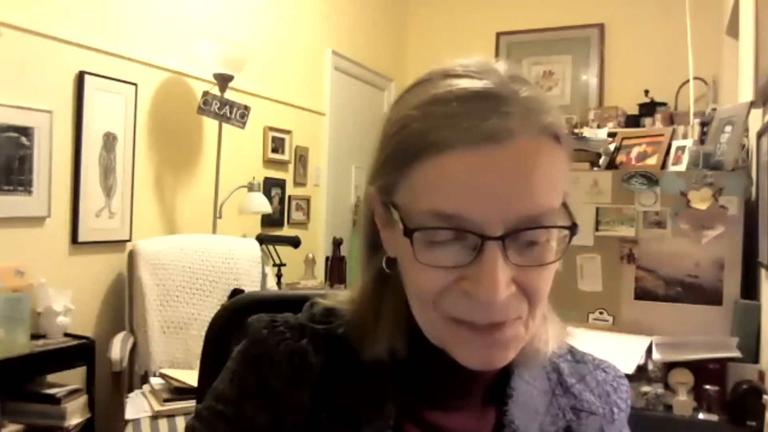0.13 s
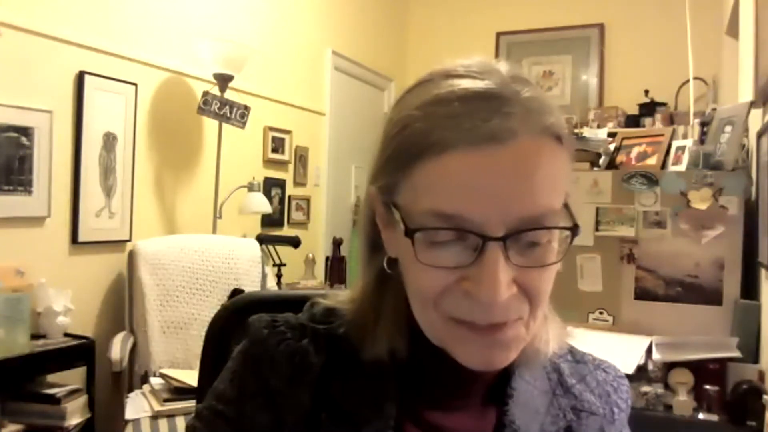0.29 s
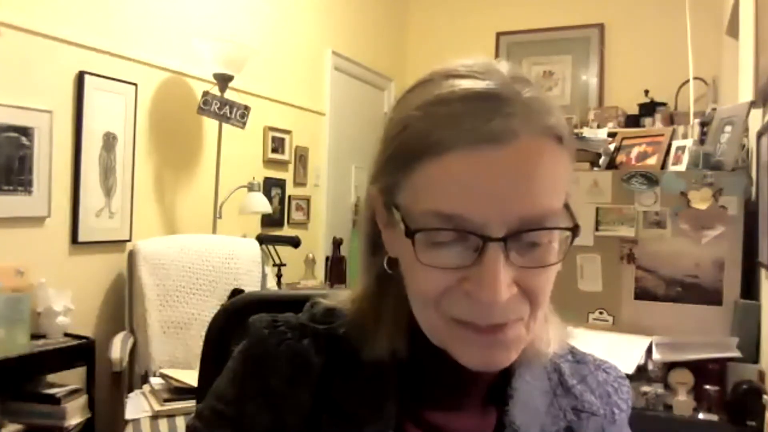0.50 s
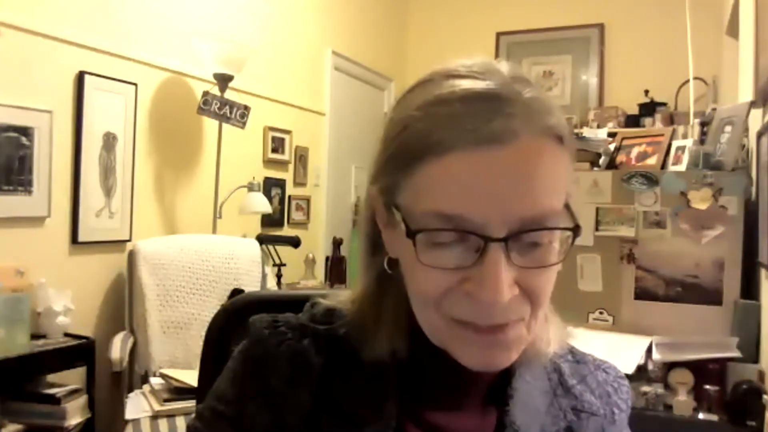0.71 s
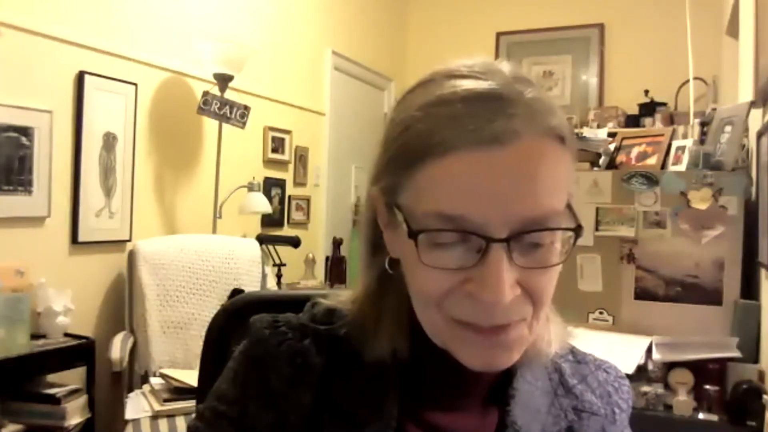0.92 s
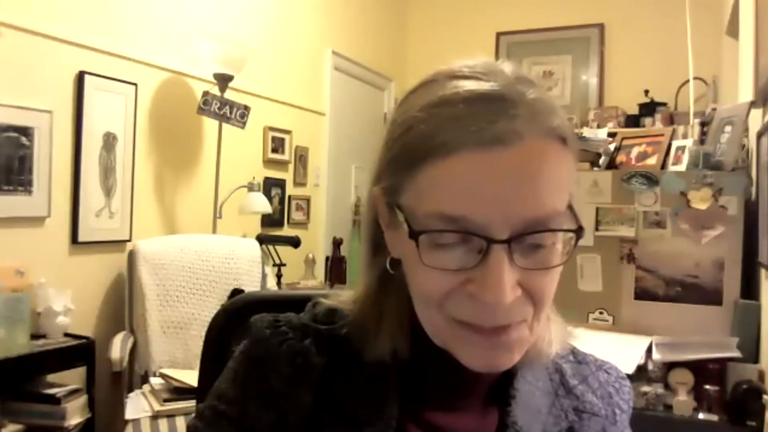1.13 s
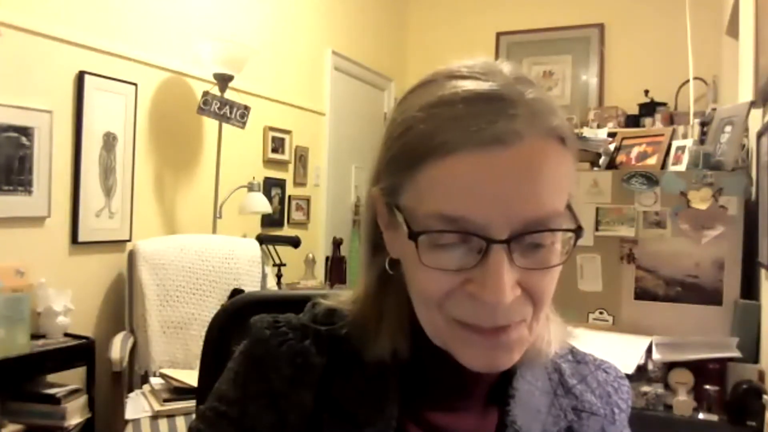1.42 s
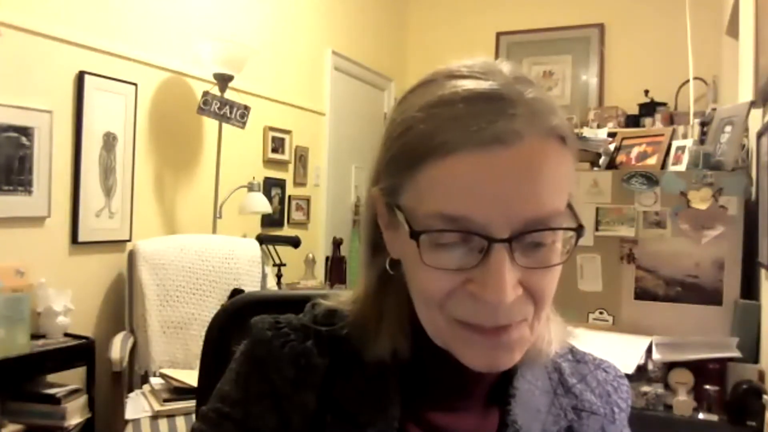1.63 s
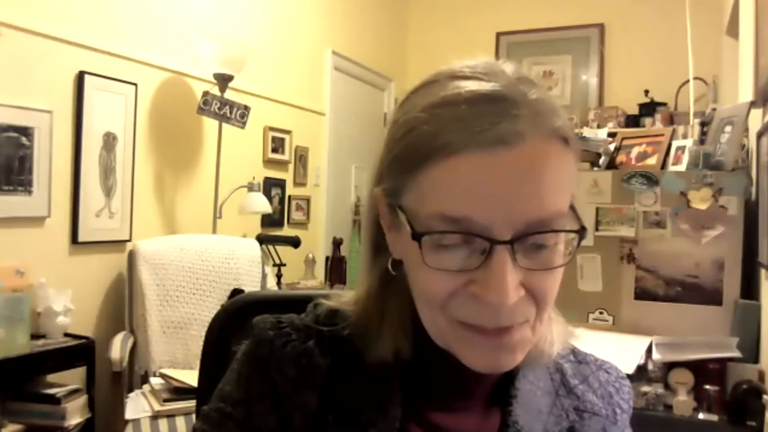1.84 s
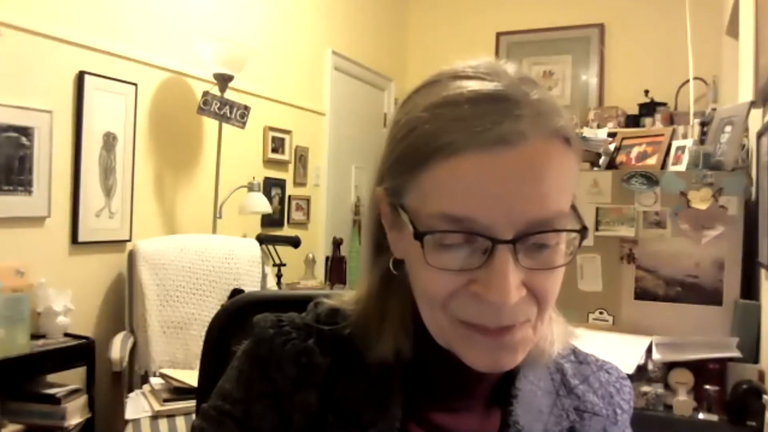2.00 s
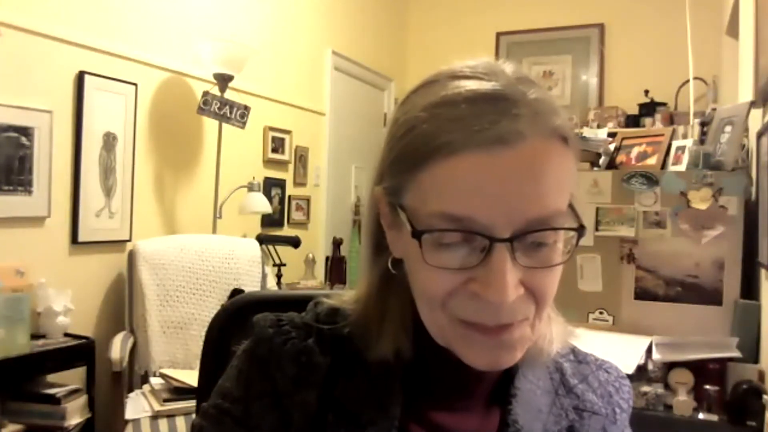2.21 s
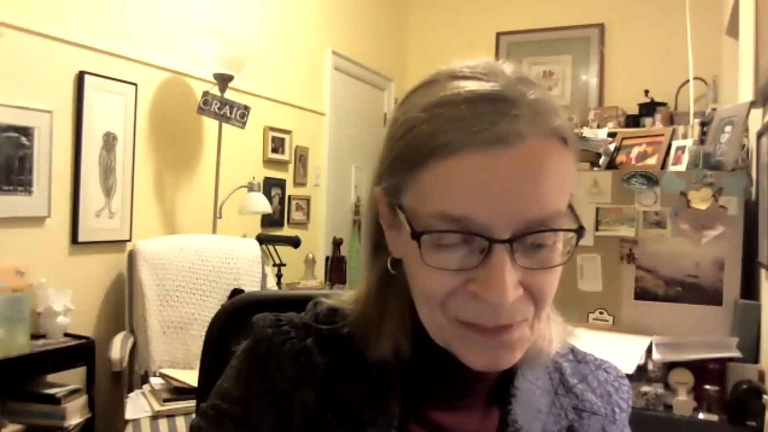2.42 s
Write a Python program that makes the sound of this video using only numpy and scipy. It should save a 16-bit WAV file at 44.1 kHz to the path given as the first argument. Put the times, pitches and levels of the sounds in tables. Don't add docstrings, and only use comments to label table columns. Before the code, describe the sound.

Close keyboard typing, dry and clicky, with a quick run, a sharp hard stroke, scattered taps and a late cluster; soft finger rustles and faint desk thuds between, thin hiss and buzzing hum behind, slightly band-limited laptop microphone sound.

```python
import sys
import numpy as np
from scipy import signal
from scipy.fft import rfft, irfft, next_fast_len
from scipy.io import wavfile
from scipy.ndimage import uniform_filter1d, map_coordinates

SR = 44100
rng = np.random.default_rng(int(sys.argv[2]) if len(sys.argv) > 2 else 0)


def makeup_ratio(level_db):
    decades = np.asarray(level_db, float) / 20
    return 10 ** decades


def materialize(psi):
    bounded = np.clip(np.atleast_2d(psi).T, -1, 1)
    quanta = np.round(bounded * 32767).astype(np.int16)
    wavfile.write(sys.argv[1], SR, quanta)


N = 112455
LEAD = SR // 50


def unit(x):
    return x / np.sqrt(np.mean(x ** 2) + 1e-20)


def along(points, hz):
    f, v = np.transpose(points)
    return np.interp(np.log(hz + 1), np.log(f + 1), v)


def wobble(rate):
    knots = rng.standard_normal(int(N * rate / SR) + 4)
    return map_coordinates(knots, [np.arange(N) * rate / SR])


def filtered(x, response):
    m = next_fast_len(N + SR // 2)
    spectrum = rfft(x, m) * response(np.fft.rfftfreq(m, 1 / SR))
    return irfft(spectrum, m)[..., :N]


def ring(family, t, count=28):
    low_hz, high_hz, t60 = family
    scatter_db, in_step, rise_cycles = 2, 0.8, 0.3
    t = t[:SR // 50]
    luck = rng.standard_normal((2, count, 1))
    place = (np.arange(count)[:, None] + rng.random((count, 1))) / count
    hz = low_hz * (high_hz / low_hz) ** place
    decay = makeup_ratio(scatter_db * luck[0] - 60 * t / t60)
    rise = (1 - np.exp(-t * hz / rise_cycles)) ** 2
    x = np.sum(np.sign(luck[1] + in_step) * decay * rise * np.sin(2 * np.pi * hz * t), 0)
    return x / np.linalg.norm(x)


# frequency in Hz, time to fall 60 dB in seconds.
ROOM_DECAY = [(500, 0.19), (1500, 0.16), (4000, 0.16), (10000, 0.18)]


def room(x, t, wet_db=0):
    tail_db, delay_s = -12.5, 0.0037
    hz, s, z = signal.stft(rng.standard_normal(len(t)), SR, nperseg=128)
    fading = z * makeup_ratio(-60 * s / along(ROOM_DECAY, hz)[:, None])
    tail = signal.istft(fading, SR, nperseg=128)[1][:len(t)] * (t > delay_s)
    echo = signal.fftconvolve(x, tail / np.linalg.norm(tail))[:len(t)]
    return x + makeup_ratio(tail_db + wet_db) * echo


# lowest Hz, highest Hz, time to fall 60 dB in seconds.
CASE_MODES = (630, 1322, 0.019)
STEM_MODES = (1385, 3420, 0.0074)
CAP_MODES = (3694, 5895, 0.0094)
EDGE_MODES = (6420, 12000, 0.014)


def contact(out, s, db, case_db, cap_db, force, fizz_db=0, snap=0):
    grain_db, edge_db = 3.5, -17.5
    t = np.arange(SR // 6) / SR
    size = unit(uniform_filter1d(rng.standard_normal(len(t)), size=25))
    grains = rng.standard_normal(len(t)) * makeup_ratio(grain_db * size)
    shape = force(t - LEAD / SR)
    drive = grains * shape + snap * (np.arange(len(t)) == LEAD)
    parts = [(0, STEM_MODES), (case_db, CASE_MODES), (cap_db, CAP_MODES),
             (cap_db + edge_db + fizz_db, EDGE_MODES)]
    sound = np.zeros(len(t))
    for level, family in parts:
        rung = signal.fftconvolve(drive, ring(family, t))[:len(t)]
        sound += makeup_ratio(level) * rung / np.linalg.norm(rung)
    sound *= np.hypot(np.linalg.norm(shape), snap)
    out[round(s * SR) + LEAD:][:len(t)] += makeup_ratio(db) * room(sound, t)


# start in seconds, peak level in dB, case thud over it in dB,
# cap click over it in dB, extra edge in dB.
KEY_PRESSES = [(0.2402, -20.5, -4.5, -6.5, -5.5), (0.361, -18, -5, -4, -2), (0.449, -24, -1, -20, 0),
               (0.5312, -27, 7, 1.5, 6.5), (0.703, -11.5, -19, -2.5, 4), (0.9017, -19, -1, -8, -6),
               (1.077, -19.5, -6.5, -14.5, 4), (1.1016, -40, 3, -8, -9), (1.2305, -29, 5.5, 7.5, 5.5),
               (1.4779, -29.5, 5.5, 5, 5), (1.727, -17, -1, -4.5, 4), (1.9222, -23, -13, -6, -17),
               (1.9362, -25, -11, -20, -3), (1.9841, -24, 0.5, -6.5, -12), (2.0304, -24.5, -2, -9.5, 4),
               (2.2845, -25.5, 5.5, 2, 5)]


def presses(out):
    press_db = -6
    blow_s, blow_rise_s = 0.0022, 0.0005
    slide_s, slide_db, slide_grows = 0.0067, -9, 0.84
    rattle_s, rattle_db = 0.0081, -2

    def blow(u):
        return np.exp(-(u / np.where(u < 0, blow_rise_s, blow_s)) ** 2)

    for s, db, case_db, cap_db, fizz_db in KEY_PRESSES:
        def slide_and_rattle(u):
            slide = makeup_ratio(slide_db - slide_grows * (db + 20)) * np.clip(1 + u / slide_s, 0, 1) ** 0.5
            rattle = makeup_ratio(rattle_db) * np.exp(-np.abs(u) / rattle_s)
            return np.where(u < 0, slide, rattle)

        contact(out, s, db + press_db, case_db, cap_db, blow, fizz_db)
        contact(out, s, db + press_db, case_db / 2, cap_db / 2, slide_and_rattle, fizz_db)


# start in seconds,
# peak level in dB, case thud over it in dB, cap click over it in dB.
KEY_TICKS = [(0.0924, -32, -2, -26), (0.2356, -33, -33, -29), (0.3127, -34, -3, -21),
             (0.4385, -31, -22, -14), (0.4662, -30.5, -22, -20), (0.4784, -39.5, -29, -18),
             (0.5626, -37.5, -1, -19), (0.6454, -30.5, -9, -23), (0.7147, -22.5, 4.5, -24),
             (0.8043, -32, -4, -21), (0.9742, -47, 10, -26), (0.9911, -34.5, -3, -24),
             (1.0112, -26, -2.5, -16), (1.1636, -35, -9, -22), (1.1826, -25.5, 1.5, -6),
             (1.2015, -28, -13, -21), (1.276, -36.5, 1.5, -14), (1.3151, -34.5, -4, -15),
             (.1185, -31.5, -3, -5), (.5318, -21.5, 0, -2), (1.2303, -18.5, -5.5, -2.5),
             (1.3405, -24.5, 0.5, 0), (1.4823, -22, 2.5, 0.5), (1.5565, -32, 4.5, -6.5),
             (1.5635, -27.5, 2, -1), (1.9217, -23.5, -5, -2), (1.9837, -25, -2.5, -1.5),
             (2.2858, -22.5, 0, -0.5), (2.4105, -32, -3, -1.5), (2.4185, -29.5, -1.5, 1),
             (1.4895, -28, -8, 6.5), (1.5432, -31.5, -1, -5), (1.803, -35, -32, -31),
             (1.9524, -46.5, 14.5, 7), (2.0184, -26.5, -15, -16), (2.0674, -33, -13, -9),
             (2.321, -37, 5, -15), (2.37, -45, -9, -20), (2.394, -31.5, -1.5, -28)]


def ticks(out):
    grit_db, grit_s = -6.5, 0.00045
    scrape_db, scrape_s = -15.5, 0.0075

    def snap_and_drag(u):
        grit = makeup_ratio(grit_db) * np.exp(-np.abs(u) / np.where(u < 0, grit_s / 2, grit_s))
        scrape = makeup_ratio(scrape_db) * np.exp(-np.abs(u) / np.where(u < 0, scrape_s / 3, scrape_s))
        return grit + scrape

    for s, db, case_db, cap_db in KEY_TICKS:
        contact(out, s, db, case_db, cap_db, snap_and_drag, snap=4)


# start in seconds, level in dB, case thud over it in dB,
# cap click over it in dB, length in seconds.
KEY_RETURNS = [(-.006, -40.5, 1, -1.5, 0.017), (0.106, -49, 3.5, 1.5, 0.03),
               (0.32, -30, -3.5, -8.5, 0.0067), (0.655, -43, -1, -1.5, 0.025),
               (0.811, -48.5, -5, -6.5, 0.014), (1.326, -46, 0, 0.5, 0.025), (1.484, -40, -1.5, -2, 0.02),
               (1.55, -42.5, -3, -1.5, 0.02), (1.809, -49.5, -3, -11, 0.0097),
               (2.078, -45.5, -11, -6.5, 0.016), (2.402, -42, 1.5, -1.5, 0.021)]


def returns(out):
    return_db, rise_s = 7, 0.0061
    for s, db, case_db, cap_db, long in KEY_RETURNS:
        contact(out, s, db + return_db, case_db, cap_db,
                lambda u: np.clip(u / rise_s, 0, 1) * np.exp(-(u / long) ** 2), fizz_db=8.5)


# start in seconds, level in dB, length in seconds.
FINGER_RUSTLES = [(0.011, -44, 0.032), (0.131, -50, 0.019), (0.259, -58, 0.019), (0.297, -47, 0.049),
                  (0.394, -61, 0.074), (0.454, -44, 0.025), (0.709, -43, 0.02), (0.73, -55, 0.1),
                  (0.96, -48.5, 0.052), (1.099, -58, 0.025), (1.163, -43.5, 0.043), (1.501, -47.5, 0.071),
                  (1.57, -46, 0.018), (1.749, -56.5, 0.072), (1.943, -52, 0.026), (2.043, -51, 0.05),
                  (2.296, -60, 0.062), (2.429, -45, 0.017)]


def rustles(out):
    case_db, cap_db, rise_s = -4, -6.5, 0.014
    for s, db, long in FINGER_RUSTLES:
        contact(out, s, db, case_db, cap_db,
                lambda u: np.clip(u / rise_s, 0, 1) * np.exp(-(u / long) ** 2))


def keys():
    out = np.zeros(N + SR)
    presses(out)
    ticks(out)
    rustles(out)
    returns(out)
    no_bass = signal.butter(N=5, Wn=520, btype="high", fs=SR, output="sos")
    return signal.sosfilt(no_bass, out[2 * LEAD:][:N])


# start in seconds, level in dB, frequency in Hz,
# time to fall 60 dB in seconds.
KEY_KNOCKS = [(0.2342, -29.5, 2286, 0.031), (0.2414, -17, 2320, 0.0095), (0.2416, -13.5, 1367, 0.0066),
              (0.3276, -26.5, 2790, 0.013), (0.3605, -17.5, 2790, 0.0093), (0.3614, -12.5, 4460, 0.0074),
              (0.3614, -22.3, 2220, 0.013), (0.4493, -17.5, 820, 0.014), (0.5308, -21, 840, 0.013),
              (0.531, -16.5, 2090, 0.0088), (0.5314, -25.5, 4790, 0.014), (0.7032, -6, 3153, 0.013),
              (0.7041, -4, 1860, 0.006), (0.7051, -16.5, 1120, 0.018), (0.7134, -24, 3550, 0.016),
              (0.7139, -27, 2900, 0.008), (0.7142, -19, 2350, 0.011), (0.9042, -9, 2675, 0.0066),
              (0.9024, -18, 3490, 0.012), (0.9034, -16, 840, 0.0085), (1.0765, -13.5, 926, 0.012),
              (1.0775, -20, 2384, 0.01), (1.078, -21.5, 1690, 0.008), (1.1022, -22.5, 800, 0.022),
              (1.2287, -19.5, 940, 0.015), (1.2295, -20, 2130, 0.0085), (1.2305, -22.5, 5700, 0.012),
              (1.4766, -17, 1960, 0.0078), (1.4794, -22, 5600, 0.0084), (1.4811, -18, 2120, 0.0074),
              (1.491, -33, 5580, 0.029), (1.4907, -34, 4430, 0.0074), (1.4899, -31.5, 2210, 0.026),
              (1.7273, -20, 4307, 0.014), (1.7261, -20, 4650, 0.011), (1.7268, -19.5, 3530, 0.015),
              (1.7323, -43, 880, 0.011), (1.9212, -14.5, 3750, 0.0075), (1.9214, -17, 4570, 0.01),
              (1.9215, -29.8, 5370, 0.008), (1.937, -14, 1470, 0.0073), (1.984, -24, 4460, 0.0095),
              (1.9853, -20, 2740, 0.0098), (1.9847, -23.5, 5870, 0.011), (2.0286, -10, 820, 0.0081),
              (2.03, -22.5, 1507, 0.015), (2.0319, -13.5, 2239, 0.0099), (2.2846, -22.5, 2060, 0.011),
              (2.2846, -12, 800, 0.0095), (2.284, -24.5, 5490, 0.013)]


def knocks():
    rise_s, rise_cycles, room_db = 0.00054, 0.68, -3.5
    out, t = np.zeros(N + SR), np.arange(SR // 6) / SR
    for s, db, hz, t60 in KEY_KNOCKS:
        rise = rise_s + rise_cycles / hz
        swell = (1 - np.exp(-t / rise)) ** 2
        mode = makeup_ratio(db - 60 * t / t60) * swell * np.sin(2 * np.pi * hz * t)
        out[round((s - rise) * SR):][:len(t)] += 2 * room(mode, t, room_db)
    return out[:N]


# start in seconds, peak level in dB, frequency in Hz,
# time to fall 60 dB in seconds.
DESK_THUDS = [
    (0.244, -31.5, 213, 0.1),
    (0.252, -40, 122, 0.099),
    (0.711, -31, 476, 0.069),
    (1.486, -39, 125, 0.56),
    (1.49, -38, 193, 0.096),
    (1.728, -47, 470, 0.031),
    (2.412, -39, 107, 0.22),
]


def desk():
    rise_s = 0.001
    out, t = np.zeros(N + SR), np.arange(SR // 4) / SR
    for s, db, hz, t60 in DESK_THUDS:
        mode = makeup_ratio(db - 60 * t / t60) * (1 - np.exp(-t / rise_s)) * np.sin(2 * np.pi * hz * t)
        out[round(s * SR):][:len(t)] += mode
    return out[:N]


# place as a share of the frame, size, width in seconds.
LOAD_EDGES = [
    (0.254, -0.0082, 0.00027),
    (0.332, 0.021, 0.0006),
    (0.548, -0.016, 0.00051),
    (0.718, 0.0081, 0.0024),
]
# frequency in Hz, rms level in dB.
COIL_WHINE = [(2790, -67), (5210, -70.5), (5580, -77)]


def supply():
    frame_hz = 24.11
    buzz_low_hz, buzz_top_hz, buzz_scatter_db = 48.6, 620, -0.1
    whine_off, whine_on, wander_hz = 0.27, 0.53, 22
    turns = np.arange(N) / SR * frame_hz
    phase = turns % 1
    kicks = np.zeros(N)
    for at, size, width in LOAD_EDGES:
        kicks += size * np.exp(-0.5 * ((phase - at) / frame_hz / width) ** 2)

    def buzz_band(hz):
        return 1j * hz / (buzz_low_hz + 1j * hz) / (1 + (hz / buzz_top_hz) ** 8)

    buzz = filtered(kicks * makeup_ratio(buzz_scatter_db * wobble(9.25)), buzz_band)
    singing = uniform_filter1d(1.0 * ((phase < whine_off) | (phase > whine_on)), size=60)
    tones = np.zeros(N)
    for hz, db in COIL_WHINE:
        level = makeup_ratio(db + 0.53 * wobble(48)) * np.sqrt(2)
        tones += level * np.sin(2 * np.pi * np.cumsum(hz + wander_hz * wobble(75)) / SR)
    return buzz + singing * tones


# frequency in Hz, level in dB per Hz.
RUMBLE_COLOUR = [(25, -42), (45, -6.5), (110, -2), (250, -8), (480, -14), (640, -42), (900, -83)]
# frequency in Hz, level in dB per Hz.
HISS_COLOUR = [(400, -6), (700, 0), (1500, -6), (2700, -9), (4700, -12), (6000, -13), (7500, -20),
               (12000, -24)]


def floor():
    def noise(points):
        return unit(filtered(rng.standard_normal(N), lambda hz: makeup_ratio(along(points, hz))))

    rumble = makeup_ratio(-51 + 2 * wobble(5.56)) * noise(RUMBLE_COLOUR)
    hiss = makeup_ratio(-62.5 + wobble(24.85)) * noise(HISS_COLOUR)
    return rumble + hiss


def scene():
    return (keys() + knocks() + desk() + supply() + floor())[None]


def starved(x, holes, edge_hz):
    hole_db = -26
    t = np.arange(N) / SR
    inside = sum(1.0 * (np.abs(t - s - long / 2) < long / 2) for s, long in holes)
    hole = uniform_filter1d(inside, size=40)
    high = filtered(x, lambda hz: 1 / (1 + (edge_hz / (hz + 1)) ** 12))
    return x - high * hole * (1 - makeup_ratio(hole_db))


def band_limit(x):
    return signal.sosfilt(signal.butter(12, 12310, fs=SR, output="sos"), x)


# start in seconds, length in seconds.
BLOW_HOLES = [(0.218, 0.0087), (0.345, 0.0062), (.506, 0.015), (0.891, 0.0061), (1.051, 0.012),
              (1.212, 0.0097), (1.47, 0.0013), (2.265, 0.0084)]
# start in seconds, length in seconds.
TREBLE_HOLES = [(0.088, 0.016), (0.63, 0.02), (0.713, 0.02), (1.304, 0.021), (1.526, 0.027), (1.734, 0.023),
                (2.01, 0.005), (2.393, 0.012)]


def record(dry):
    tile_from_hz, tile_sigma = 6400, 0.9
    mic_low_hz, mic_top_hz = 36.5, 11010
    x = starved(dry, BLOW_HOLES, 1050)
    x = starved(x, TREBLE_HOLES, 7800)
    hz, _, z = signal.stft(x, SR, nperseg=256)
    draws = rng.standard_normal((33, z.shape[2] // 4 + 1))
    tiles = np.kron(draws, np.ones((4, 4)))[:len(hz), :z.shape[2]]
    kept = (tiles < tile_sigma) | (hz[:, None] < tile_from_hz)
    x = signal.istft(z * kept, SR, nperseg=256)[1][:, :N]

    def mic_band(hz):
        return 1 / (1 + (mic_low_hz / (hz + 1)) ** 10) / (1 + (hz / mic_top_hz) ** 30)

    return band_limit(filtered(x, mic_band))


dry = scene()
out = record(dry)
materialize(out)
```